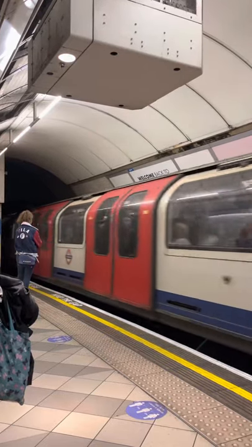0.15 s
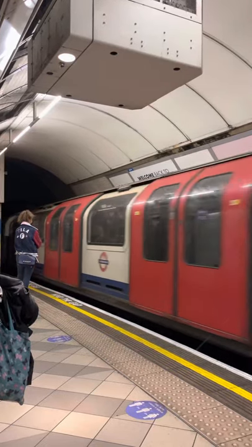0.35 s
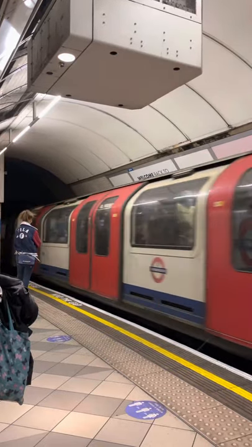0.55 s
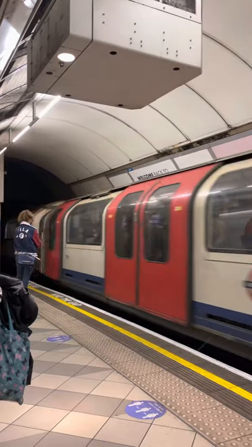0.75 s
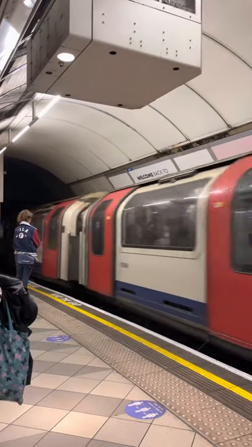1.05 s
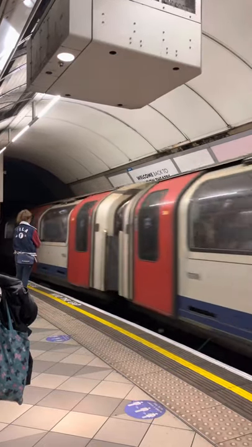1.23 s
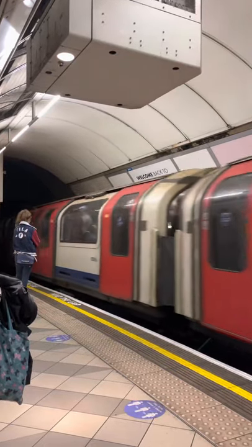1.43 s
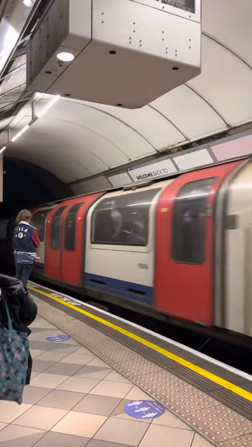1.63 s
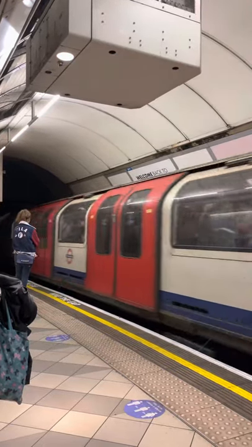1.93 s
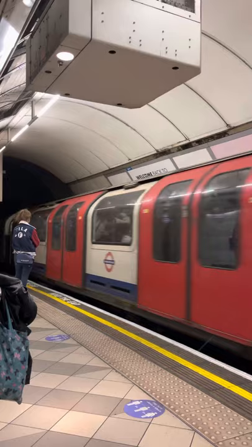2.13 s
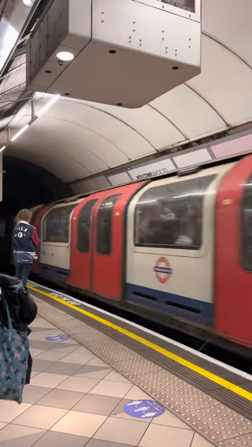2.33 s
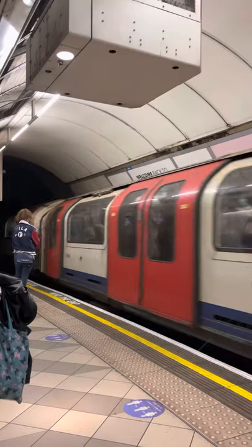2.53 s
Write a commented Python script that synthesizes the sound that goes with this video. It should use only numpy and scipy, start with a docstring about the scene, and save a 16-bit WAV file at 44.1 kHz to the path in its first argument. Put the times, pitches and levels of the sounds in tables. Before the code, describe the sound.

An underground train runs close past a platform microphone throughout, with throbbing low boom, muffled roar and thin steel hiss in a reverberant tunnel. A heavy thump with a rushing surge and clatter hits at 0.2 seconds, a softer thump at 0.6. A rail drone rises briefly around 1.05, swishes follow at 1.2 and 1.4, thumps at 1.8 to 2.0, then a faint high fluttering squeal from 2.1 fades as rolling continues.

```python
"""On the platform of a narrow tiled underground station, a train runs close by along the tunnel.
The car bodies boom as noise in low resonances; the wheels rumble, roar and hiss as coloured noise.
The noise surges as wheels and gaps between cars rush by; thumps, clatter and faint rattles come from
the running gear, the wheels ring thinly and the rail drones once, rising in pitch.
Near the end a wheel flange squeals faintly: a fluttering tone with resonant noise for its echoes."""
import sys
import numpy as np
from scipy import signal
from scipy.fft import rfft, irfft, next_fast_len
from scipy.io import wavfile
from scipy.ndimage import uniform_filter1d

SR = 44100
rng = np.random.default_rng(int(sys.argv[2]) if len(sys.argv) > 2 else 0)


def store_wav(level_fs):
    """Save 16-bit WAV to argv[1]."""
    pcm = np.round(np.clip(np.atleast_2d(level_fs), -1, 1) * 32767)
    wavfile.write(sys.argv[1], SR, pcm.T.astype(np.int16))


N = 118188
T = np.arange(N) / SR  # seconds
HZ = np.maximum(np.fft.rfftfreq(next_fast_len(N, real=True), 1 / SR), 1)

# In all resonance tables, width is at half power and level is the relative power of the mode.
# In all colour tables, only the balance between frequencies counts.
# In all event tables, rise is the spread of a bell-shaped onset; fall is the time for power to drop to 1/e.

# Stereo image at the microphones, side against middle. Each row: frequency in Hz, level in dB.
SIDE_LEVEL = [(80, -53), (140, -46), (200, -28), (330, -19), (460, -17), (680, -6.5), (850, -10.5),
              (1060, -6.5), (1550, -16), (2050, -8), (2600, -5.5), (3400, -1), (4000, -5), (4450, -3.5),
              (5000, 3), (6000, -6), (11000, -48.5)]
# Left channel against right. Each row: frequency in Hz, level difference in dB.
LEFT_RIGHT_BALANCE = [(200, 0), (330, -2.13), (470, -0.6), (650, 0.1), (2400, 0.5), (4300, -0.46),
                      (5000, -3.5), (6000, 1.5), (8000, -2.5)]
# Treble comes straight from the train and reaches the left channel first.
TREBLE_LAG_S, LAG_FROM_HZ, LAG_FULL_HZ = 0.0001647, 3920, 4820

# Loose metal in the running gear, faint.
RATTLES_PER_S, RATTLE_DB, RATTLE_T60_S = 65, -52, 0.077
RATTLE_SPREAD_DB = -5  # mean step down from the hardest knock, before the cap
RATTLE_LOW_HZ, RATTLE_HIGH_HZ = 960, 7200

# Flange squeal: a swell to a level stretch, then echoes and direct tone die at their own pace.
SQUEAL_FROM_S, SQUEAL_TO_S = 2.112, 2.215
SQUEAL_DB, SQUEAL_RISE_DB_PER_S = -35.2, 145
SQUEAL_ECHO_T60_S, SQUEAL_TONE_T60_S = 0.8, 0.35
SQUEAL_TONE_DB, SQUEAL_WAVER_HZ = 1.5, 40  # direct tone against its echoes; rms pitch wander
SQUEAL_FLUTTER_PER_S, SQUEAL_FLUTTER_JITTER, SQUEAL_FLUTTER_DB = 70, 0.3, 5
# Pitch of the direct tone, before the wander. Each row: time in seconds, pitch in Hz.
SQUEAL_PITCH = [(2.07, 4120), (2.10, 3970), (2.13, 4090), (2.145, 4000), (2.17, 3990), (2.205, 4060),
                (2.24, 4130)]
# Modes of the squealing wheel. Each row: frequency in Hz, width in Hz, level in dB.
SQUEAL_MODES = [(4005, 90, 0), (4125, 190, 0), (8050, 160, -13)]

# Thin ringing of the rolling wheels. Each row: frequency in Hz, width in Hz, level in dB.
WHEEL_MODES = [(2060, 60, 0), (2480, 60, -1), (3140, 70, -2), (4010, 35, -8), (4930, 170, -4),
               (5754, 40, -12), (5994, 70, -9), (6170, 60, -10), (6875, 25, -12.5), (10810, 45, -12),
               (11184, 70, -12)]
WHEEL_RING_DB = -13.5  # against the hiss and surge levels that drive it

# Bursts of clatter from the running gear. Each row: peak time in seconds, level in dB, fall in seconds.
CLATTERS = [(.205, -28, .012), (.24, -32, 0.019), (.275, -32, 0.011), (.315, -30, 0.028), (.385, -41, .02),
            (.625, -33.5, .025), (1.195, -34, .012), (1.548, -32, .008), (1.935, -38, 0.017),
            (2.245, -31.5, .035)]
CLATTER_RISE_S = 0.01
# Colour of the clatter. Each row: frequency in Hz, level in dB per Hz.
CLATTER_COLOUR = [(600, -20), (1100, 4.5), (2400, -2), (3400, -7), (5000, -24)]

# Wheels thump over uneven rail.
# Each row: peak time in seconds, level in dB, rise in seconds, pitch of the main ring in Hz.
THUMPS = [(.215, -13, .017, 365), (.62, -23.5, .03, 373), (1.77, -24, .035, 390), (1.945, -18.5, .012, 384),
          (2.0, -21.5, .012, 384)]
# Weaker modes of the thump. Each row: frequency in Hz, width in Hz, level in dB.
THUMP_MODES = [(305, 24, -2), (455, 31, 2.5), (598, 30, -3.5), (870, 90, -6.5)]
THUMP_MODES_DB, THUMP_FALL_S = -1.5, 0.02  # all weaker modes together, against the main ring

# A passing drone of the rail.
DRONE_AT_S, DRONE_DB, DRONE_RISE_S, DRONE_FALL_S = 1.05, -18.5, 0.075, 0.08
DRONE_RISE_HZ_PER_S = 200
# Its resonances at the peak. Each row: frequency in Hz, width in Hz, level in dB.
DRONE_MODES = [(550, 26, -4), (612, 32, 0), (705, 32, -5), (860, 60, -11)]

# Wheels and car gaps rush by.
# Each row: peak time in seconds, hiss level in dB, roar level in dB, rise in seconds,
# fall in seconds (each surge layer shortens it by its own factor).
SURGES = [(.20, -30, -16.5, 0.039, 0.11), (.31, -51, -34.5, 0.023, 0.3), (.968, -33.5, -47, 0.015, 0.0353),
          (1.185, -34, -26.5, 0.016, 0.04), (1.37, -38.5, -24.5, 0.046, 0.068),
          (1.405, -38, -45, .006, 0.025), (1.6, -41.5, -31.5, 0.058, 0.11),
          (1.95, -33.5, -22.5, 0.032, 0.14), (2.25, -43, -35, 0.015, .06)]
# Colour of the surge hiss. Each row: frequency in Hz, level in dB per Hz.
SURGE_HISS_COLOUR = [(700, -9), (1300, 7), (2200, 5), (3600, 4.5), (4900, 3), (6500, 2.5), (8500, -3.5),
                     (10200, 5), (11400, 0.5), (12300, -31)]
# Colour of the surge roar. Each row: frequency in Hz, level in dB per Hz.
SURGE_ROAR_COLOUR = [(120, -22), (300, -4), (460, -6.5), (800, -4.5), (1100, -11), (1700, -24), (2300, -19),
                     (4000, -33.5), (8000, -58)]

# Booming of the car bodies in the tunnel. Each row: frequency in Hz, width in Hz, level in dB.
BOOM_MODES = [(47, 5, -11), (70, 10, -.5), (88, 14, 0)]
# Jolts that set them booming. Each row: peak time in seconds, level in dB, fall in seconds.
BOOMS = [(0.023, -15.5, 0.037), (.125, -17, .012), (.225, -19, .03), (.29, -20.5, .015),
         (.40, -14.5, 0.045), (.49, -19.5, .03), (.61, -16.5, 0.029), (.82, -17, 0.036), (.9, -20, 0.039),
         (1.06, -16, 0.019), (1.16, -19.5, 0.059), (1.33, -20, .015), (1.365, -14, 0.026),
         (1.53, -15.5, 0.049), (1.795, -14.5, .05), (1.92, -27, 0.027), (2.0, -18, .025), (2.07, -18, .014),
         (2.17, -17, 0.02), (2.245, -20.5, 0.04), (2.38, -20.5, 0.032), (2.585, -17, 0.033),
         (2.66, -22, .04)]
BOOM_RISE_S, BOOM_STEADY_DB = 0.018, -33

# Rumble of the running gear. Each row: frequency in Hz, width in Hz, level in dB.
RUMBLE_MODES = [(117.6, 20, -6), (151.6, 18, 1), (190.6, 28, -2), (227, 20, -7)]
# Course of the rumble. Each row: time in seconds, level in dB.
RUMBLE_LEVEL = [(0, -20), (.2, -20), (.43, -21.5), (.49, -23.5), (.62, -17.5), (.75, -24.5), (.82, -17.5),
                (.98, -25.5), (1.08, -20.5), (1.27, -27), (1.35, -18), (1.66, -22), (1.78, -17),
                (1.86, -26), (2.0, -20.5), (2.17, -23.5), (2.3, -19.5), (2.52, -21.5), (2.68, -22)]
# Colour of the roar of the rolling wheels. Each row: frequency in Hz, level in dB per Hz.
ROAR_COLOUR = [(20, -40), (60, -20), (170, -22), (250, -6), (310, -0.5), (375, 0.5), (450, -1.5),
               (570, -3.5), (680, -9.5), (870, -10), (1080, -19.5), (1400, -25.5), (2200, -51.5)]
# Course of the roar, before the lift ROAR_DB. Each row: time in seconds, level in dB.
ROAR_LEVEL = [(0, -16), (.13, -19), (.22, -16.5), (.42, -17.5), (.62, -16.5), (.77, -22), (.9, -18),
              (1.02, -20.5), (1.2, -20.5), (1.33, -17), (1.5, -19.5), (1.6, -17.5), (1.8, -19),
              (1.88, -19.5), (1.98, -18), (2.18, -19), (2.38, -19), (2.53, -20.5), (2.68, -18.5)]
ROAR_DB, ROAR_PATCHY_DB = 0.5, 0.77
# Colour of the hiss of steel on steel. Each row: frequency in Hz, level in dB per Hz.
HISS_COLOUR = [(500, -3), (1200, 3.5), (1750, -1.5), (2080, 0.5), (2500, -1.5), (2900, -4), (3150, -3.5),
               (3600, -6), (4400, -8.5), (4950, -16), (5500, -9), (6200, -11.5), (8500, -16),
               (10000, -11.5), (11100, -16.5), (12200, -24.5)]
# Course of the hiss. Each row: time in seconds, level in dB.
HISS_LEVEL = [(0, -29.5), (.1, -33.5), (.45, -32), (.62, -33.5), (.78, -34), (1.1, -33), (1.4, -32.5),
              (1.5, -33.5), (1.6, -32.5), (1.82, -33), (2.1, -31), (2.35, -31.5), (2.55, -34.5),
              (2.68, -32)]
HISS_PATCHY_DB = 1.0

LOW_CUT_HZ, CUTOFF_HZ = 37, 12600


def from_db(db):
    """Decibels to amplitude gain."""
    return 10 ** (np.asarray(db) / 20)


def rms_one(x):
    """Scale to an rms of 1."""
    return x / np.sqrt(np.mean(x ** 2) + 1e-20)


def in_time(rows):
    """A curve of (seconds, value) at every sample."""
    return np.interp(T, *np.transpose(rows))


def at_hz(points):
    """A curve of (Hz, value) at every frequency, straight over log frequency."""
    hz, value = np.transpose(points)
    return np.interp(np.log(HZ), np.log(hz), value)


def drift(rate):
    """Slow chance with about `rate` changes a second; spread 1."""
    step = 40  # samples between the points of the slow curve
    r = np.exp(-2 * np.pi * rate * step / SR)
    chance = rng.standard_normal(N // step + 2002)
    slow = signal.lfilter([1], [1, -2 * r, r * r], chance)[2000:]  # past the filter's start-up
    return np.interp(np.arange(N) / step, np.arange(len(slow)), rms_one(slow))


def resonances(modes):
    """Gain per frequency of steep-sided resonances, added as power."""
    power = 0
    for hz, width, db in modes:
        detuning = (HZ - hz * hz / HZ) / (1.55 * width)
        power = power + from_db(db) ** 2 / width / (1 + detuning ** 2) ** 2
    return np.sqrt(power)


def stereo_spectra(gain):
    """Spectra of a coloured noise at the left and right channels: width, balance and treble lag."""
    mid, side = rfft(rng.standard_normal((2, 2 * len(HZ) - 2)))
    width = from_db(at_hz(SIDE_LEVEL))
    lean = from_db(at_hz(LEFT_RIGHT_BALANCE) / 2)  # half to each channel
    lag = TREBLE_LAG_S * np.interp(HZ, [LAG_FROM_HZ, LAG_FULL_HZ], [0, 1])
    left = (mid + width * side) * lean
    right = (mid - width * side) / lean * np.exp(-2j * np.pi * HZ * lag)
    return gain / np.sqrt(1 + width ** 2) * np.array([left, right])


def noise(gain):
    """Steady stereo noise of the given colour; rms 1."""
    return rms_one(irfft(stereo_spectra(gain))[:, :N])


def evened(x, span_s):
    """Noise with the swells slower than the span taken out of both channels alike."""
    power = uniform_filter1d(np.mean(x ** 2, axis=0), max(int(span_s * SR), 1))
    return x / np.sqrt(power + 1e-12)


def patchy_noise(colour, patchy_db, rate):
    """Stereo noise whose octaves flicker, partly together and partly on their own; rms 1."""
    spectra = stereo_spectra(from_db(at_hz(colour)))
    together = drift(rate)
    octave = np.clip(np.log2(HZ / 100), 0, 7)
    out = 0
    for k in range(8):
        band = irfft(spectra * np.maximum(1 - abs(octave - k), 0))[:, :N]  # overlapping octaves
        out = out + band * from_db(patchy_db * (0.34 * together + drift(rate)))
    return rms_one(out)


def swell(s, db, rise_s, fall_s):
    """A source comes up to its peak at s, then dies away exponentially in the tunnel."""
    before, after = np.minimum(T - s, 0), np.maximum(T - s, 0)
    return from_db(db) * np.exp(-(before / rise_s) ** 2 / 2 - after / (2 * fall_s))


def rattle(count=14):
    """Small random knocks ring the fittings under the cars, each a decaying resonance."""
    out = np.zeros((2, N))
    r = from_db(-60 / (RATTLE_T60_S * SR))  # decay per sample
    for hz in np.geomspace(RATTLE_LOW_HZ, RATTLE_HIGH_HZ, count):
        knocks = rng.random(N) < RATTLES_PER_S / count / SR
        strength = from_db(RATTLE_SPREAD_DB * np.minimum(rng.exponential(1, N), 3))
        w = 2 * np.pi * hz / SR
        # the tiny offset keeps the filter from stalling in silence
        ring = signal.lfilter([0, np.sin(w)], [1, -2 * r * np.cos(w), r * r], knocks * strength + 1e-18)
        out += ring / hz * from_db(rng.normal(0, 3.5, (2, 1)))  # each channel at its own level
    return from_db(RATTLE_DB) * rms_one(out)


def squeal():
    """A flange rubs the rail and its wheel rings: a fluttering tone, and its modes smeared by echoes."""
    pitch = in_time(SQUEAL_PITCH) + SQUEAL_WAVER_HZ * drift(48.8)
    lag = np.array([[0], [TREBLE_LAG_S / 2]])  # left, right
    phase = 2 * np.pi * (np.cumsum(pitch) / SR - lag * pitch)
    jitter = SQUEAL_FLUTTER_JITTER * np.array([drift(22), drift(17)])
    flutter = np.cumsum(SQUEAL_FLUTTER_PER_S * (1 + jitter), axis=1) / SR  # cycles, per channel
    tone = rms_one(np.sin(phase) * from_db(SQUEAL_FLUTTER_DB * np.sin(2 * np.pi * flutter)))
    echoes = evened(noise(resonances(SQUEAL_MODES)), span_s=0.034)
    early, late = np.maximum(SQUEAL_FROM_S - T, 0), np.maximum(T - SQUEAL_TO_S, 0)
    rubbing = from_db(SQUEAL_DB - SQUEAL_RISE_DB_PER_S * early)
    echo_level = from_db(-60 * late / SQUEAL_ECHO_T60_S)
    tone_level = from_db(SQUEAL_TONE_DB - 60 * late / SQUEAL_TONE_T60_S)
    return rubbing * (echoes * echo_level + tone * tone_level)


def wheel_ring():
    """Rolling keeps the wheels ringing thinly in narrow modes, more so as they pass close by."""
    passes = sum(swell(s, db, rise, fall) for s, db, _, rise, fall in SURGES)
    drive = from_db(in_time(HISS_LEVEL)) + passes
    return from_db(WHEEL_RING_DB) * drive * noise(resonances(WHEEL_MODES))


def clatter():
    """Shaken metal under the cars, blurred by the tunnel into short bursts of noise."""
    bursts = sum(swell(s, db, CLATTER_RISE_S, fall) for s, db, fall in CLATTERS)
    return bursts * noise(from_db(at_hz(CLATTER_COLOUR)))


def thumps():
    """A wheel hits uneven rail and the running gear rings dully: one clear mode over weaker ones."""
    weaker = from_db(THUMP_MODES_DB) * evened(noise(resonances(THUMP_MODES)), span_s=0.0156)
    start = rng.uniform(0, 2 * np.pi)
    out = 0
    for s, db, rise, hz in THUMPS:
        main_ring = np.sqrt(2) * np.sin(2 * np.pi * hz * T + start)  # rms 1
        out = out + swell(s, db, rise, THUMP_FALL_S) * (main_ring + weaker)
    return out


def rail_drone():
    """The rail hums briefly in a few close resonances that rise in pitch together."""
    hum = evened(noise(resonances(DRONE_MODES)), span_s=0.04)
    glide = np.exp(1j * np.pi * DRONE_RISE_HZ_PER_S * (T - DRONE_AT_S) ** 2)
    gliding = np.real(signal.hilbert(hum, next_fast_len(N))[:, :N] * glide)  # shifts every frequency
    return swell(DRONE_AT_S, DRONE_DB, DRONE_RISE_S, DRONE_FALL_S) * gliding


def surges():
    """Each close pass brings a swish of noise and a roar that lingers longer."""
    hiss = sum(swell(s, db, rise, fall * 0.39) for s, db, _, rise, fall in SURGES)
    roar = sum(swell(s, db, rise, fall * 0.75) for s, _, db, rise, fall in SURGES)
    hiss_noise = noise(from_db(at_hz(SURGE_HISS_COLOUR)))
    roar_noise = evened(noise(from_db(at_hz(SURGE_ROAR_COLOUR))), span_s=0.05)
    return hiss * hiss_noise + roar * roar_noise


def boom():
    """Jolts make the car bodies throb in a few low resonances."""
    jolts = sum(swell(s, db, BOOM_RISE_S, fall) for s, db, fall in BOOMS)
    throb = evened(noise(resonances(BOOM_MODES)), span_s=0.036)
    return (from_db(BOOM_STEADY_DB) + jolts) * throb


def rolling():
    """All the wheels on the rails: resonant rumble, and roar and hiss as flickering noise."""
    rumble = evened(noise(resonances(RUMBLE_MODES)), span_s=0.065)
    roar = evened(patchy_noise(ROAR_COLOUR, ROAR_PATCHY_DB, rate=3.6), span_s=0.1)
    hiss = patchy_noise(HISS_COLOUR, HISS_PATCHY_DB, rate=16)
    out = from_db(in_time(RUMBLE_LEVEL)) * rumble
    out = out + from_db(ROAR_DB + in_time(ROAR_LEVEL)) * roar
    return out + from_db(in_time(HISS_LEVEL)) * hiss


def scene():
    """The whole train as heard from the platform."""
    details = rattle() + squeal() + wheel_ring() + clatter() + thumps() + rail_drone()
    return details + surges() + boom() + rolling()


def record(dry):
    """The microphone sheds the deepest bass, overloaded peaks are clipped and the top is cut."""
    low_cut = signal.butter(6, LOW_CUT_HZ, "high", fs=SR, output="sos")
    top_cut = signal.cheby2(14, 70, CUTOFF_HZ + 900, fs=SR, output="sos")  # 70 dB down 900 Hz above
    heard = signal.sosfilt(low_cut, dry)
    return signal.sosfilt(top_cut, np.clip(heard, -0.97, 0.97))


dry = scene()
out = record(dry)
store_wav(out)
```